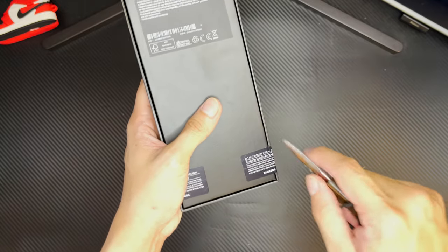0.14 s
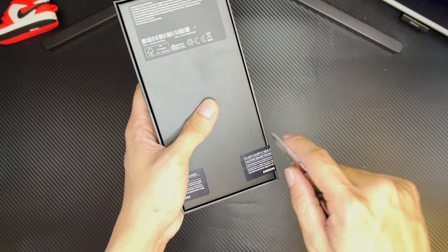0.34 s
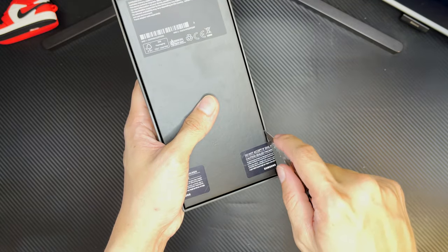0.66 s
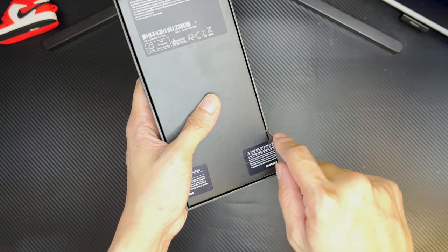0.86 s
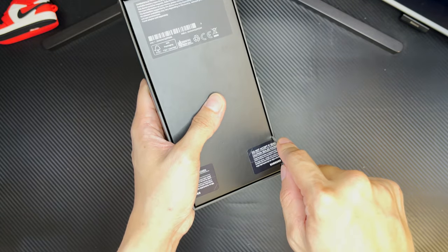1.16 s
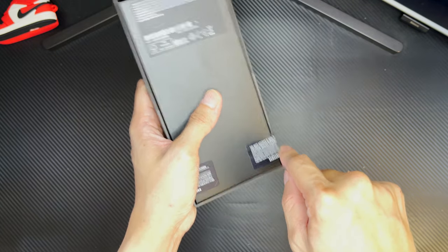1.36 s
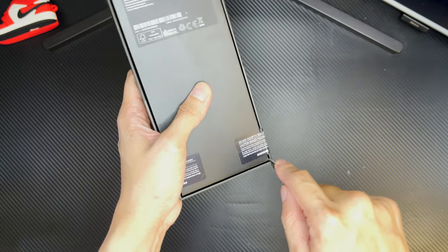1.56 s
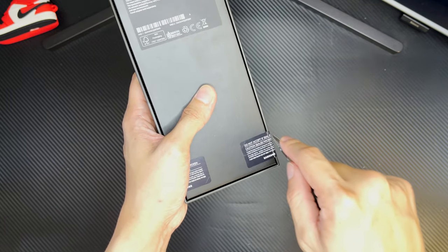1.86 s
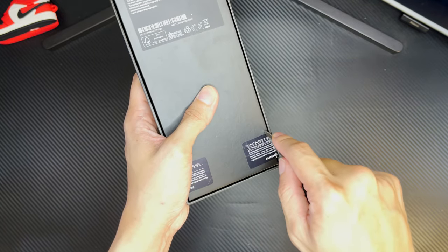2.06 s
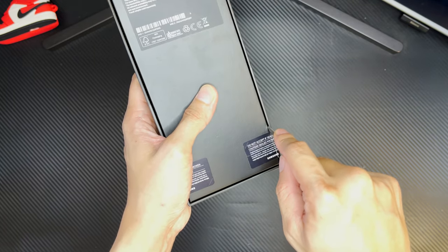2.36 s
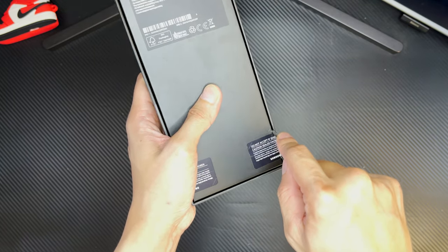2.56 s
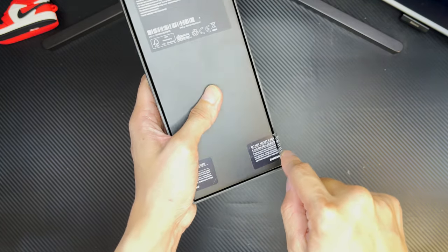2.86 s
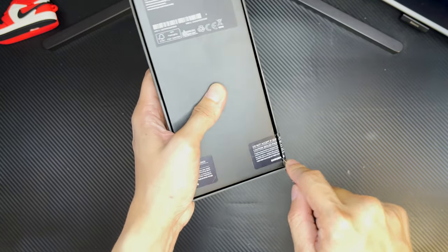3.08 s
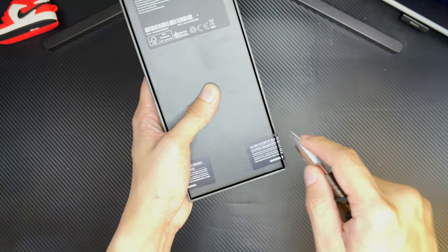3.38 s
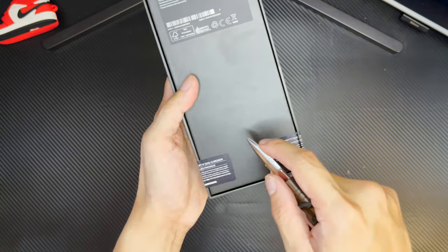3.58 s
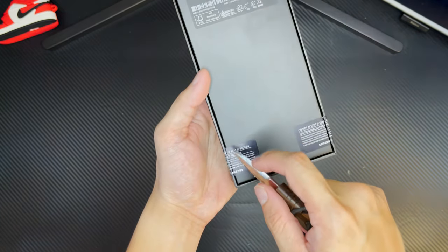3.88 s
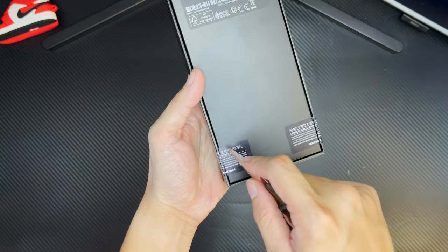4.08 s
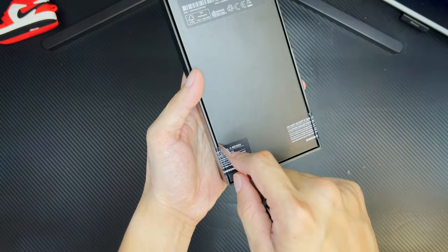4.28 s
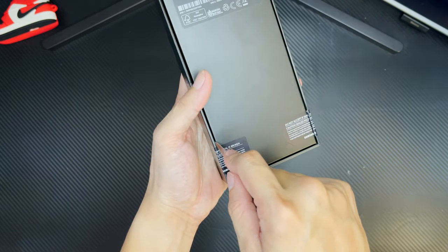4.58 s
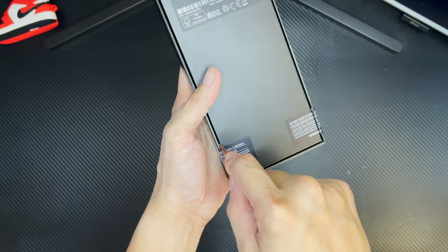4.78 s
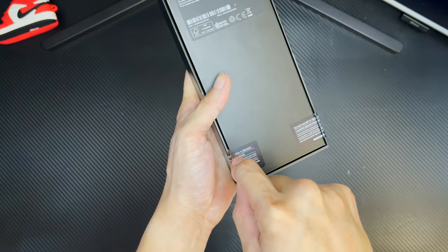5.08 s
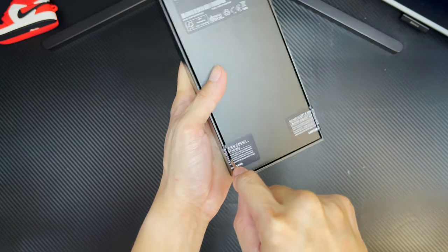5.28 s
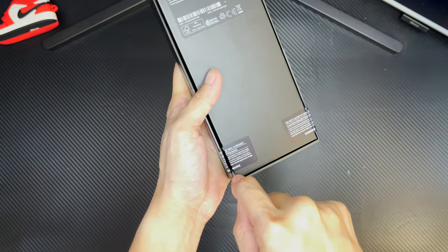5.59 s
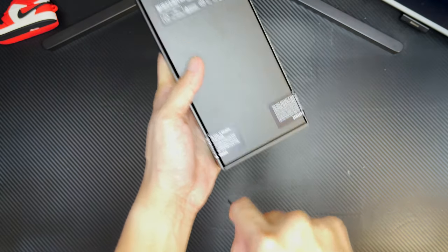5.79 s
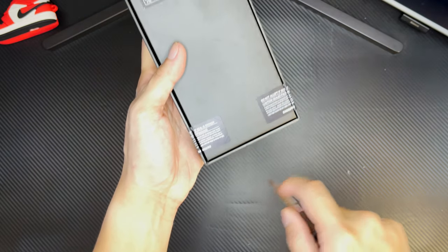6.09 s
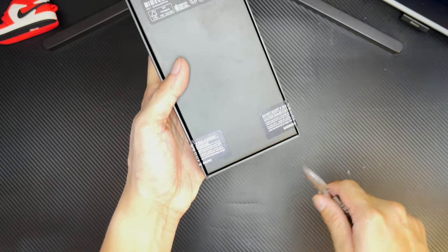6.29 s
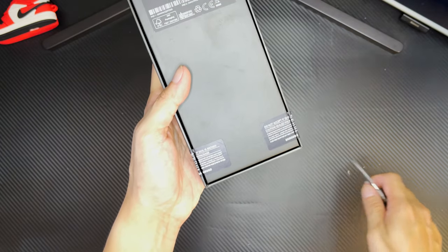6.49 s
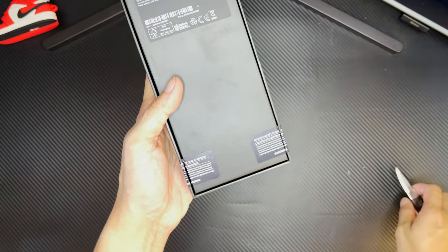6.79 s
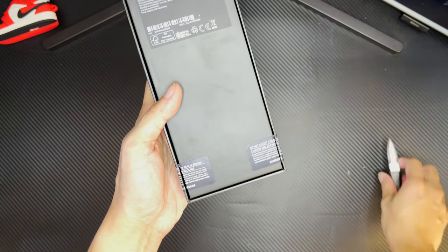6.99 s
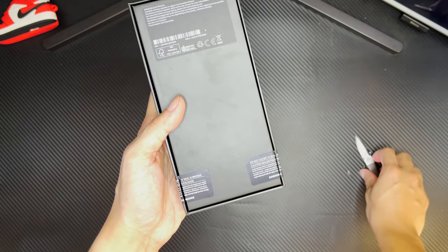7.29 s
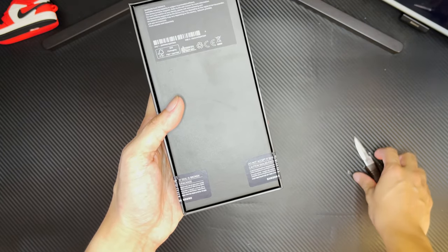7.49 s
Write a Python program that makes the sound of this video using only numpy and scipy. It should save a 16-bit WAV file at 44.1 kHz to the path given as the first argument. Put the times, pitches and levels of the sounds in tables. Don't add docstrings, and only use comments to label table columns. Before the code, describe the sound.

Sparse sharp fibre snaps and soft scrapes on a hand-held card box, hollow knocks, thin friction squeaks, finally a knife dropped with a hard clack.

```python
import sys
import numpy as np
from scipy import signal
from scipy.fft import rfft, irfft
from scipy.io import wavfile
from scipy.ndimage import uniform_filter1d

SR = 44100
rng = np.random.default_rng(int(sys.argv[2]) if len(sys.argv) > 2 else 0)


def elevation(decibels):
    levels = np.asarray(decibels, float)
    return 10 ** (levels / 20)


def to_wav(s):
    ch = np.atleast_2d(s).T
    pcm = np.round(np.clip(ch, -1, 1) * 32767)
    wavfile.write(sys.argv[1], SR, pcm.astype(np.int16))


N = 337365


def level(x, db):
    return x * elevation(db) / np.sqrt(np.mean(x ** 2))


def curve(table):
    s, value = np.transpose(table)
    return np.interp(np.arange(N) / SR, s, value)


def on_log(table, hz):
    f, value = np.transpose(table)
    return np.interp(np.log(hz + 1), np.log(f), value)


def band(x, hz, width_hz):
    return signal.lfilter(*signal.iirpeak(hz, hz / width_hz, fs=SR), x)


def two_bands(x, hz, first_width_hz, second_width_hz):
    return band(band(x, hz, first_width_hz), hz, second_width_hz)


def walk(rate_hz, size=N):
    hold = max(int(SR / rate_hz), 48)
    steps = np.repeat(rng.standard_normal(size // hold + 1), hold)
    return 1.8 * uniform_filter1d(uniform_filter1d(steps, hold), hold)[:size]


def slips(size):
    slip_db = 2.0 * rng.exponential(size=size) + 1.9 * walk(76, size)
    return rng.standard_normal(size) * elevation(slip_db)


def ring(modes, push_s, scatter_db, detune, stutter_s):
    t = np.arange(SR // 6) / SR
    hz, t60_s, db = np.transpose(modes)[:, :, None]
    chance = rng.standard_normal((2, len(modes), 1))
    sign = (-1) ** np.arange(len(modes))[:, None]
    swing = np.sin(2 * np.pi * hz * (1 + detune * chance[1]) * t)
    decay = np.exp(-np.log(1000) * t / t60_s)
    free = sign * elevation(db + scatter_db * chance[0]) * swing * decay
    u = t[:1024] / stutter_s
    jolts = rng.standard_normal(1024) ** 4 * u * np.exp(-u)
    push = np.sin(np.pi * np.clip(t[:128] / push_s, 0, 1)) ** 2
    y = signal.fftconvolve(free.sum(axis=0), np.convolve(jolts, push))[:len(t)]
    return y / np.abs(y).max()


def crack(hz, width_hz, decay_s, rustle_db=-22, rustle_s=0.0019):
    t = np.arange(SR // 6) / SR
    fade = np.exp(-t / decay_s) + elevation(rustle_db) * np.exp(-t / rustle_s)
    attack = 1 - np.exp(-t / 0.0008)
    y = two_bands(rng.standard_normal(len(t)) * fade * attack, hz, width_hz, width_hz)
    return y / np.abs(y).max()


def add(out, start_s, x, pan_db):
    i = int(start_s * SR)
    x = x[:N - i]
    out[:, i:i + len(x)] += x * elevation(np.array([[pan_db], [-pan_db]]) / 2)


# start_s, peak_db, pitch_hz,
# sizzle_db, tear_db
SNAPS = [(0.0228, -38.5, 2600, -11, -7), (0.703, -33.5, 2000, -40, -28), (0.703, -43, 3630, -40, -13),
         (1.428, -42, 1760, -7, -20.5), (1.476, -21.5, 2000, 0, -1.5), (1.479, -24, 4140, -3, -5),
         (1.728, -34.5, 1800, -3, -16.5), (1.7486, -37.5, 1800, -6.5, -4.5),
         (2.2648, -23.5, 2700, -30, -5.5), (2.687, -24.5, 3600, -4, -5), (2.9236, -18, 3700, -13, -2.5),
         (2.932, -22, 4100, 2, -6), (2.938, -13, 1470, -13.5, -5.5), (3.4537, -44.5, 2370, -13, 4),
         (3.509, -24, 2260, -1, -3), (3.546, -32, 2540, -14, -16), (4.588, -38.5, 3400, -16, -3.5),
         (4.841, -43.5, 2480, -48, -12), (5.296, -16, 2840, -7, 0.5), (5.298, -22, 1120, -1.5, -17.5),
         (5.332, -36.5, 1120, -5.5, -3), (5.3755, -35, 2520, -10, -5), (5.4483, -37.5, 3000, 1.5, -15),
         (5.4651, -3.5, 3140, -13, -22.5), (5.8284, -15, 3050, -4.5, 2.5), (5.83, -20.5, 10800, -18.5, -26),
         (3.51, -22.5, 10440, -14, -30), (4.589, -28.5, 7040, -37.5, -34), (7.372, -26.5, 7200, -33, -30.5),
         (7.442, -30.5, 7200, -32.5, -28.5), (7.458, -31, 6970, -28, -30), (7.24, -12.5, 2050, -30, -20),
         (5.4676, -16.5, 1160, -40.5, -25), (4.918, -50.5, 1100, -40, -21)]
# start_s, peak_db, sizzle_db
TICKS = [(2.105, -58, -12), (2.13, -69, 3), (2.595, -59, -9), (3.1811, -51, -5.5), (3.418, -64, -3),
         (5.082, -58, -27), (3.487, -59, 17), (3.604, -52, 8.5), (3.652, -54.5, 8), (3.7397, -54.5, 12),
         (3.921, -54.5, -0.5), (3.9998, -66, 1), (4.028, -57, -12), (4.669, -53, -2), (5.172, -53.5, -21),
         (5.686, -56, -4.5), (5.96, -71, 11.5), (5.987, -68.5, 5)]


def blade_snaps():
    out = np.zeros((2, N))
    tick_hz, tick_tear_db = 1800, -2
    ticks = [(s, db, tick_hz, sizzle_db, tick_tear_db) for s, db, sizzle_db in TICKS]
    strain_n = 880
    for s, db, hz, sizzle_db, tear_db in SNAPS + ticks:
        pan_db = -0.5 + 1.1 * rng.standard_normal()
        snap = ring([(hz, .004, 0), (hz * 0.92, .003, -6)], 0.000076, 3.3, 0.012, 0.00063)
        tear = 0.5 * crack(hz, 0.31 * hz, 0.0003)
        tear = tear + elevation(tear_db) * crack(2400, 3000, 0.003, -22.5, .018)
        sizzle = crack(6800, 6000, 0.0019 * elevation(-0.2 * (db + 20.5)))
        add(out, s, elevation(db - 6.0) * (snap + tear) + elevation(db + sizzle_db) * sizzle, pan_db)
        growth = np.exp(np.arange(-strain_n, 0) / SR / 0.0043)
        creep = band(slips(strain_n) * growth, hz, 0.5 * hz)
        add(out, s - strain_n / SR, elevation(db - 23.0) * creep, pan_db)
    return out


# start_s, peak_db, struck_hz
THUMPS = [(0.022, -47.5, 456), (0.7048, -34, 250), (1.43, -45, 630), (1.476, -9.5, 524),
          (1.729, -39.5, 640), (2.104, -37.5, 376), (2.2649, -24.5, 440), (2.689, -17.5, 460),
          (2.812, -60, 200), (2.9325, -26, 900), (2.9377, -16, 900), (2.9407, -14.5, 450),
          (3.4558, -33, 450), (3.5089, -22.5, 507), (3.65, -46, 316), (3.92, -50, 444), (4.409, -45, 381),
          (4.669, -51.5, 250), (5.2964, -19.5, 360), (5.3327, -31, 332), (5.377, -44, 504),
          (5.455, -34, 374), (5.467, -33.5, 310), (5.8292, -20, 800)]
# pitch_hz, t60_s, level_db
BOX = [(122, 0.012, -11), (266, 0.031, 5.5), (310, 0.02, 9.5), (367, 0.025, 5.5), (468, 0.021, -1),
       (542, 0.029, 1), (630, 0.0083, -1.5), (800, 0.022, -3.5), (930, 0.074, -13.5), (1120, 0.061, -13.5)]
# start_s, peak_db
LID_RINGS = [(5.468, -27), (5.8, -48), (3.511, -35), (4.841, -43), (5.9, -50)]
# pitch_hz, t60_s, level_db
LID = [(1120, 0.049, -1), (1020, 0.02, -3.5)]


def box_thumps():
    out = np.zeros((2, N))
    for s, db, hz in THUMPS:
        struck = [(f, t60_s, mode_db - 5 * abs(np.log2(f / hz))) for f, t60_s, mode_db in BOX]
        punch = ring([(hz, 0.012, 0)], 0.00058, 0, 0, 0.0001)
        hollow = ring(struck, 0.00075, 1.7, 0.017, 0.0002)
        rustle = crack(hz, 1.8 * hz, 0.0044, -9.0, 0.018)
        add(out, s + .001, elevation(db + 1.0) * (0.92 * punch + 0.38 * hollow + 0.25 * rustle), 1.2)
    for s, db in LID_RINGS:
        add(out, s, elevation(db) * ring(LID, 0.0012, 2.3, 0.0069, 0.0004), 0)
    return out


# start_s, peak_db, clack_db, blade_db, pan_db
DROPS = [
    (7.16, -3.5, -2.5, -2.5, 1),
    (7.237, 2.5, -12.5, -20, 0),
    (7.24, -19, 9, 15, -1.5),
    (7.248, -20.5, -15, -15.5, -1),
    (7.265, -18.5, -17, -11.5, 1.5),
    (7.172, -20, -2, -16, -3),
    (7.371, -21, -4.5, -37, 0),
    (7.441, -20.5, -7.5, -15, -1),
    (7.452, -23.5, -11.5, -41, 4.5),
]
# pitch_hz, t60_s, level_db
DESK = [(131.7, 0.18, -16), (250, 0.097, -20), (298.5, 0.19, -19), (366, 0.13, -14), (414, 0.022, -8),
        (497, 0.12, -12.5), (651, 0.076, -14.5), (752, 0.031, -1), (844, 0.014, -2.5), (845, 0.036, -6.5),
        (890, 0.074, -7.5), (1122, 0.05, -8.5), (1649, 0.013, -8.5), (1960, 0.026, -9)]
HANDLE = [(3050, 0.022, -6), (3162, 0.056, -7.5), (3390, 0.014, -5), (3635, 0.026, -6), (3752, 0.03, -1),
          (4360, 0.022, -10.5), (4600, 0.011, -11)]
BLADE = [(6140, 0.031, -0.5), (7200, 0.017, -9), (8060, 0.025, -7.5), (8900, 0.036, -12.5),
         (10030, 0.038, -4.5), (10410, 0.02, -10.5)]
# centre_hz, width_hz
DESK_NULLS = [(2550, 300), (5350, 750)]


def knife_on_desk():
    out = np.zeros((2, N))
    punch_hz = 814
    for s, db, clack_db, blade_db, pan_db in DROPS:
        desk = 0.33 * crack(600, 890, 0.0023, -14, 0.032)
        desk = desk + 0.5 * ring(DESK, 0.00033, 1.7, 0.0059, 0.00013)
        punch = ring([(punch_hz, 0.02, 0), (punch_hz * .62, .025, -6)], 0.0005, 0, 0.02, 0.0001)
        handle = ring(HANDLE, .0001, 4.2, 0.012, 0.00029)
        handle = handle + 0.28 * crack(3500, 1200, 0.00063, -15.0, 0.04)
        handle = handle + 0.39 * crack(1500, 1200, 0.0021, -21.0, 0.044)
        blade = ring(BLADE, .00006, 1.0, 0.002, .00003) + 0.45 * crack(7400, 2200, .002, -20, 0.023)
        drop = desk + 0.9 * punch + elevation(clack_db) * handle + elevation(blade_db) * blade
        add(out, s + 0.0007, elevation(db - 1.0) * drop, pan_db)
    for hz, width_hz in DESK_NULLS:
        out = out - band(out, hz, width_hz)
    return out


# start_s, length_s, level_db, sizzle_db
SCRAPES = [(0, 0.026, -71, 8), (0.359, 0.35, -75, -35), (0.639, 0.36, -69, -46), (0.796, 0.58, -70, -36),
           (1.419, 0.14, -62.5, 1), (1.516, 0.19, -79.5, 4.5), (1.736, 0.073, -65, -6),
           (1.905, 0.25, -75.5, -6), (2.466, 0.17, -72, -6), (3.131, 0.11, -80, 1),
           (3.269, 0.16, -66.5, -6), (3.479, 0.059, -56, -9), (3.598, 0.082, -79, 6), (3.643, 0.14, -80, 8),
           (3.747, 0.14, -59.5, -8), (4.21, 0.17, -62.5, -4), (4.671, 0.2, -67.5, -1),
           (5.178, 0.36, -69.5, -2), (6.038, 0.18, -68.5, -30.5), (6.85, 0.1, -86.5, -3),
           (7.136, 0.11, -57.5, -11)]
# start_s, length_s, level_db, sizzle_db
EDGE_SCRAPES = [(0.545, 0.13, -80, -4), (.88, 0.42, -76, -15), (5.735, 0.21, -62.5, 0.5),
                (5.79, 0.081, -52.5, -7), (6.235, 0.082, -94, 13.5), (6.519, 0.075, -89, 11),
                (6.685, 0.07, -92.5, 6), (6.971, 0.079, -92, 5), (7.608, 0.067, -81.5, 11.5)]
# start_s, length_s, level_db, centre_hz
SHIFTS = [(0.515, 0.42, -65.5, 395), (0.935, 0.17, -61, 360), (3.24, 0.12, -62.5, 359),
          (4.264, 0.11, -64, 525), (4.202, 0.1, -72, 870), (2.109, 0.34, -63.5, 337),
          (2.691, 0.08, -57, 395), (3.519, 0.28, -63, 340), (4.618, 0.2, -69, 545),
          (4.833, 0.128, -69, 396), (5.299, 0.082, -52, 346), (6.029, 0.093, -70, 700),
          (5.74, 0.26, -51, 394.5), (6.2, 0.17, -63, 319), (6.481, 0.18, -62, 307),
          (6.835, 0.13, -70.5, 511)]
# centre_hz, width_hz, level_db
CARD_TOP = [(4300, 650, 4.5), (6800, 1800, -2), (10400, 2600, -15)]


def scrapes():
    out = np.zeros((2, N))
    face_hz, edge_hz = 2170, 3350
    rubs = [(*row, face_hz, 1) for row in SCRAPES] + [(*row, edge_hz, 1) for row in EDGE_SCRAPES]
    rubs += [(s, length_s, db, -37, hz, 1.3) for s, length_s, db, hz in SHIFTS]
    for s, length_s, db, sizzle_db, hz, breadth in rubs:
        u = np.arange(int(length_s * SR)) / (length_s * SR)
        x = slips(SR * 2 // 3)[:len(u)] * np.sin(np.pi * u ** 0.53) ** 2.0
        width_hz = breadth * hz
        card = two_bands(x, hz, 0.19 * width_hz, 0.36 * width_hz)
        card = card + 0.68 * band(band(x, hz * 0.58, 0.16 * width_hz), hz * 0.54, 0.26 * width_hz)
        card = card + 0.46 * band(x, hz * 0.45, 0.039 * hz)
        top = sum(elevation(top_db) * two_bands(x, f, wide_hz, wide_hz * 2) for f, wide_hz, top_db in CARD_TOP)
        add(out, s, level(card, db) + level(top, db + sizzle_db), 0)
    return out


# start_s, length_s, level_db, centre_hz
BRUSHES = [(1.192, 0.11, -82, 7500), (3.65, 0.19, -63.5, 8100), (3.758, 0.092, -61.5, 7900),
           (5.464, .13, -56.5, 3500), (2, 0.14, -81.5, 6160), (4.587, 0.058, -62, 3050),
           (5.3, 0.11, -67.5, 6700), (5.755, 0.15, -60.5, 8700), (2.265, 0.068, -58, 2200),
           (2.19, 0.12, -81, 6200), (4.1, 0.078, -71.5, 2200), (3.9, 0.051, -72, 2600),
           (4.84, .06, -74, 2040), (5.83, 0.064, -64.5, 4500), (2.94, .08, -58, 2500),
           (2.69, .06, -61.5, 2600), (2.265, 0.037, -67, 6200), (7.56, 0.095, -74.5, 8700)]


def skin_brushes():
    out = np.zeros((2, N))
    for s, length_s, db, hz in BRUSHES:
        u = np.arange(int(length_s * SR)) / (length_s * SR)
        x = slips(SR // 4)[:len(u)] * np.sin(np.pi * u ** 0.35) ** 2.1
        add(out, s, level(two_bands(x, hz, 0.39 * hz, 0.45 * hz), db), 0)
    return out


# time_s, level_db
GRIP = [(0.0, -73.5), (0.8, -66), (1.23, -67), (1.57, -66), (1.72, -68.5), (2.89, -69), (3.05, -73),
        (3.47, -64.5), (3.77, -66), (4.68, -72), (5.37, -67.5), (5.55, -75), (6.05, -71), (6.48, -75.5),
        (7.12, -73.5)]


def palm_creak():
    creak = slips(N)
    hollow = sum(elevation(db) * band(creak, hz, 1.0 / t60_s) for hz, t60_s, db in BOX)
    held = np.arange(N) < GRIP[-1][0] * SR
    return elevation(curve(GRIP)) * level(hollow, -1.3) * held


# start_s, length_s, first_hz, last_hz, peak_db
RASPS = [(.35, 1, 800, 826, -70), (.36, 0.23, 1778, 1750, -62.5), (.4, 0.14, 2084, 2070, -65.5),
         (.43, 0.13, 2280, 2260, -74), (.63, 0.16, 1010, 1070, -60.5), (.62, 0.14, 3190, 3070, -70.5),
         (.63, 0.13, 2035, 2070, -56), (.7, 0.5, 1806, 1750, -59.5), (.78, 0.4, 2315, 2300, -65.5),
         (.82, 0.36, 2093, 2023, -59.5), (.9, 0.28, 3290, 3290, -70), (.9, 0.18, 930, 968, -70),
         (1.2, 1, 865, 837, -76.5), (1.22, 0.42, 1800, 1833, -70.5), (2.47, 0.13, 1250, 1290, -84),
         (6.9, 0.18, 627, 614, -73), (1.34, 0.13, 3050, 3050, -77), (3.285, 0.1, 1340, 1316, -63),
         (3.76, 0.2, 1200, 1205, -69.5), (3.86, 0.13, 1280, 1360, -62), (.4, 0.32, 6300, 6400, -86),
         (.62, .13, 6200, 6250, -93), (.65, 0.13, 8250, 8270, -84), (.53, 0.18, 3950, 3950, -82),
         (.9, 0.16, 6240, 6500, -84.5), (7.13, 0.043, 1540, 1520, -64.5), (7.14, 0.024, 4650, 4650, -59),
         (7.62, 0.046, 4200, 4200, -71), (4.5, 0.096, 2650, 2660, -85.5)]
CHIRPS = [
    (1.045, 0.062, 4630, 4620, -60),
    (1.045, 0.05, 4300, 4250, -62),
    (1.285, 0.11, 4670, 4600, -64),
    (1.285, 0.09, 4250, 4160, -64),
    (1.88, 0.26, 5660, 5310, -67),
]
WHISTLES = [
    (.38, .84, 1772, 1800, -68),
    (1.485, 0.54, 1805, 1680, -60.5),
    (1.95, 0.19, 4470, 4310, -79),
    (4.3, 0.14, 1990, 1980, -75),
    (4.85, 0.2, 4870, 4951, -92),
    (6.07, 0.4, 4170, 4250, -78.5),
    (6.7, 0.39, 2047, 1990, -84),
    (6.7, 0.39, 1043, 1020, -82),
]
# attack_share, release_share, fade_db, roughness (0-1), fray_share (of pitch)
RASP = (.3, .3, 11, .97, .12)
CHIRP = (.1, .88, 24, .93, .08)
WHISTLE = (.02, .3, 14, .7, .06)


def squeaks():
    out = np.zeros((2, N))
    flutter_db, flutter_hz = 2, 30.3
    for rows, kind in [(RASPS, RASP), (CHIRPS, CHIRP), (WHISTLES, WHISTLE)]:
        attack, release, fade_db, rough, fray = kind
        for s, length_s, first_hz, last_hz, db in rows:
            size = int(length_s * SR)
            u = np.arange(size) / size
            fade_in = np.clip(1 - u / attack, 0, 1)
            fade_out = np.clip(1 - (1 - u) / release, 0, 1)
            fray_hz = fray * first_hz
            noise = (walk(fray_hz, SR) + 1j * walk(fray_hz, SR))[:size] / np.sqrt(2)
            swing = np.sqrt(1 - rough ** 2) + rough * noise
            phase = 2 * np.pi * np.cumsum(first_hz + (last_hz - first_hz) * u) / SR
            tone_db = db - fade_db * (fade_in + fade_out) + flutter_db * walk(flutter_hz, SR)[:size]
            add(out, s, elevation(tone_db) * np.real(swing * np.exp(1j * phase)), 0)
    return out


# centre_hz, t60_s
ROOM_T60 = [(180, 0.3), (360, 0.18), (720, 0.11), (1440, 0.046), (2880, 0.075), (5760, 0.22), (11500, 0.15)]


def room(x):
    tail_db, early_db = -11.5, -17
    t = np.arange(SR * 2 // 3) / SR
    out = []
    for channel in x:
        noise = rng.standard_normal((2, len(t)))
        tail = sum(band(noise[0], hz, hz * 1.9) * np.exp(-np.log(1000) * t / t60_s) for hz, t60_s in ROOM_T60)
        tail = tail * (1 - np.exp(-t / 0.0087))
        early = noise[1] * np.exp(-t / 0.0034) * (1 - np.exp(-t / 0.0046))
        response = elevation(tail_db) * tail / np.linalg.norm(tail)
        response = response + elevation(early_db) * early / np.linalg.norm(early)
        out.append(signal.fftconvolve(channel, response)[:N])
    mid = (out[0] + out[1]) / 2
    side = band(out[0] - out[1], 1900, 8900)
    return np.array([mid + 0.68 * side, mid - 0.76 * side])


def drone(hz, width_hz):
    return level(two_bands(rng.standard_normal(N), hz, width_hz, width_hz * 0.7), 0)


# time_s, level_db
TRAFFIC = [(0, -63.5), (1.5, -66), (2.7, -61), (4.7, -61.5), (5.7, -61), (6.6, -62), (6.75, -68),
           (6.92, -60), (7.05, -67.5), (7.4, -57.5), (7.65, -66)]
# centre_hz, width_hz, level_db
TRAFFIC_BANDS = [(52, 13, -1), (76, 26, -2), (126, 56, -0.5)]
# peak_s, spread_s, pitch_hz, level_db
SWELLS = [(0.0, 0.048, 54.6, -60), (.8, 1, 76, -57), (1.89, 0.098, 52, -48.5), (2.41, 0.38, 126, -64),
          (3.03, 0.15, 52, -59.5), (3.85, 0.15, 76, -63), (4.22, 0.083, 52, -53), (5.859, 0.11, 90, -54),
          (7.23, 0.07, 109.9, -43.5), (2.71, 0.033, 115, -48.5)]


def traffic():
    t = np.arange(N) / SR
    bands = sum(elevation(db + 1.5 * walk(3.3)) * drone(hz, width_hz) for hz, width_hz, db in TRAFFIC_BANDS)
    rumble = elevation(curve(TRAFFIC)) * bands
    for s, spread_s, hz, db in SWELLS:
        rumble = rumble + elevation(db) * np.exp(-((t - s) / spread_s) ** 2) * drone(hz, 0.55 * hz)
    side_db = -22
    apart = elevation(side_db) * np.roll(rumble, SR // 9) * np.array([[1], [-1]])
    return rumble + apart


# pitch_hz, density_db (per Hz)
AIR = [(88, -23.5), (150, -17.5), (201, -15.5), (370, -9), (1140, -25.5), (4150, -35), (5080, -54.5),
       (6820, -51), (9340, -39.5), (11000, -44.5), (12300, -65.5), (16000, -91.5), (22000, -120)]
# time_s, level_db
STIR = [(0, -1), (.9, -2.5), (2.2, -2), (3.6, -3), (5.0, -2.5), (6.0, -5), (6.7, -2), (7.65, -3)]


def air_noise():
    spectrum = rfft(rng.standard_normal(N)) * elevation(on_log(AIR, np.fft.rfftfreq(N, 1 / SR)))
    return level(irfft(spectrum, N), 0)


def room_air():
    air_db, patch_db = -78, 7
    mid, side = air_noise(), 1.3 * air_noise()
    air = np.array([mid + side, mid - side])
    centres_hz = 200 * 2 ** np.arange(0, 6, .75)
    patchy = sum(elevation(patch_db * np.tanh(walk(5.6))) * band(air, hz, 0.93 * hz) for hz in centres_hz)
    return elevation(air_db + curve(STIR)) * patchy


def scene():
    near = blade_snaps() + box_thumps() + knife_on_desk()
    near = near + scrapes() + skin_brushes() + palm_creak() + squeaks()
    near = signal.sosfilt(signal.butter(3, 185, "high", fs=SR, output="sos"), near)
    return near + room(near) + traffic() + room_air()


def top_cut(x):
    return signal.sosfilt(signal.butter(12, 12460, fs=SR, output="sos"), x)


# pitch_hz, lag_rad
PORTS = [(30, 0), (3000, 0), (6000, .9), (9300, 3.14), (10600, 5.2), (12000, 6.2), (20000, 6.3)]
# pitch_hz, lean_db
LEAN = [(30, 0.2), (190, 0.5), (350, 2), (700, 0.5), (1400, 0.3), (5000, -1), (22000, -0.5)]


def record(dry):
    null_hz, null_width_hz, top_hz, leak_db = 9200, 1750, 11600, -15.5
    hz = np.fft.rfftfreq(N, 1 / SR)
    lag_rad, lean_db = on_log(PORTS, hz), on_log(LEAN, hz)
    turn = np.exp(.5j * np.array([-lag_rad, lag_rad]))
    lean = elevation(np.array([lean_db, -lean_db]) / 2)
    left, right = irfft(rfft(dry) * turn * lean, N)
    mid, side = (left + right) / 2, (left - right) / 2
    mid = mid - signal.filtfilt(*signal.iirpeak(null_hz, null_hz / null_width_hz, fs=SR), mid)
    ports = np.array([mid + side, mid - side])
    x = signal.sosfilt(signal.cheby1(8, .5, top_hz, fs=SR, output="sos"), ports)
    x = x + elevation(leak_db) * band(ports, 13000, 5100)
    return top_cut(np.clip(x, -1, 1))


dry = scene()
out = record(dry)
to_wav(out)
```